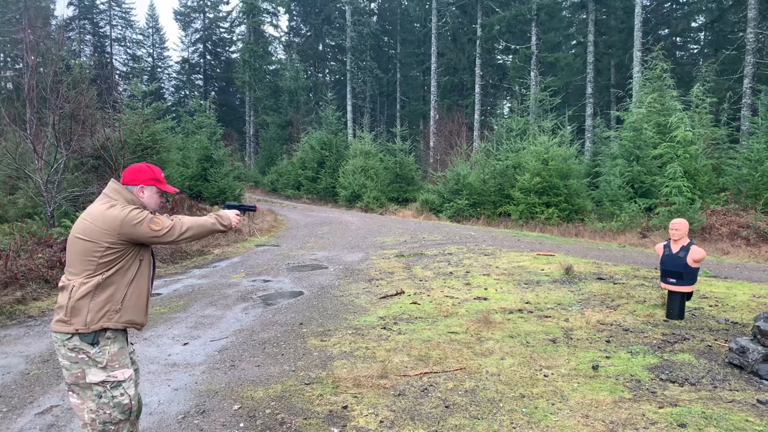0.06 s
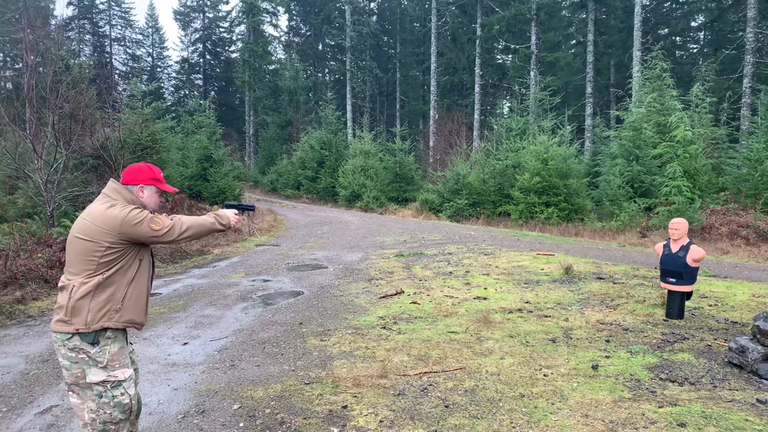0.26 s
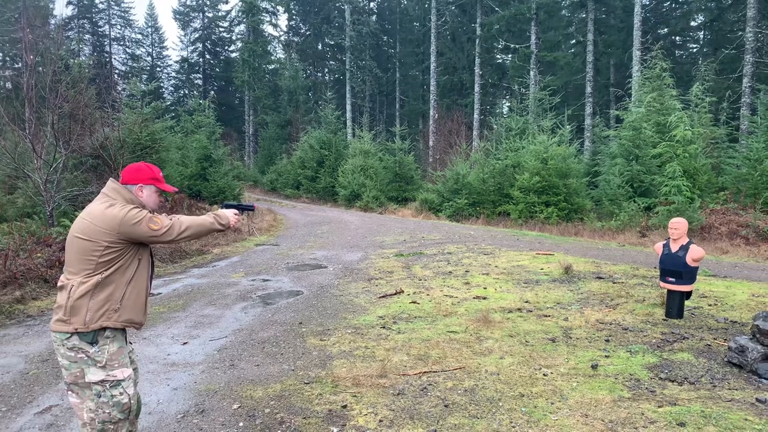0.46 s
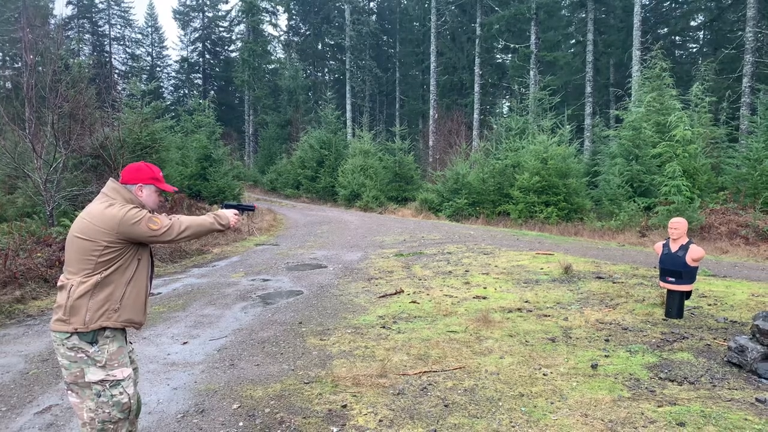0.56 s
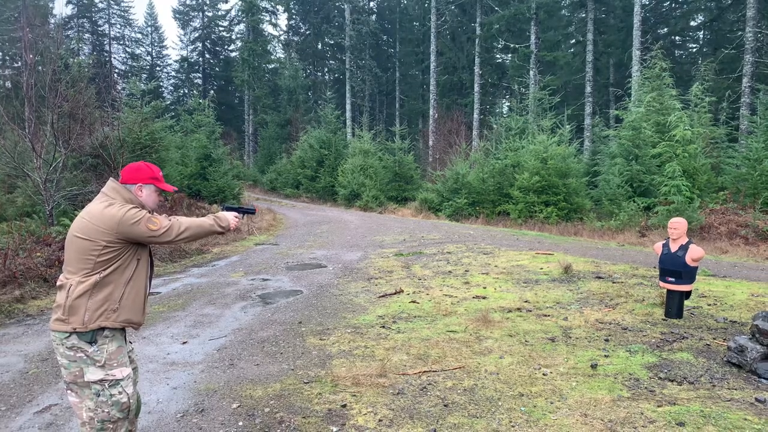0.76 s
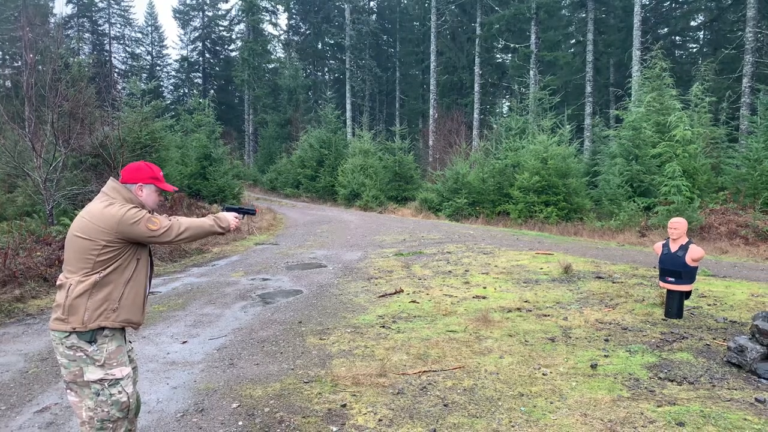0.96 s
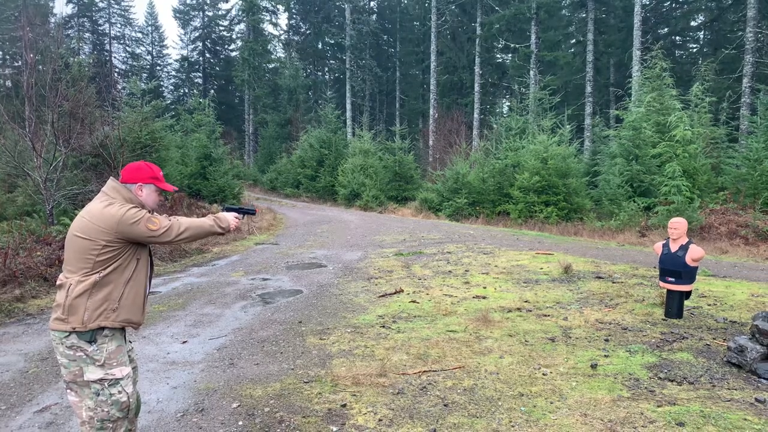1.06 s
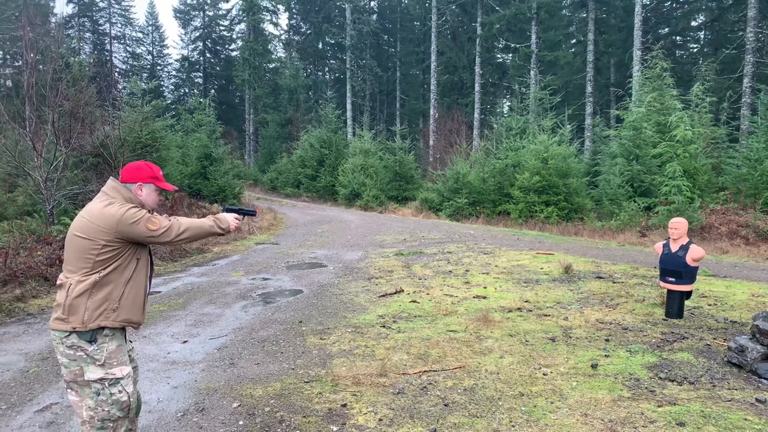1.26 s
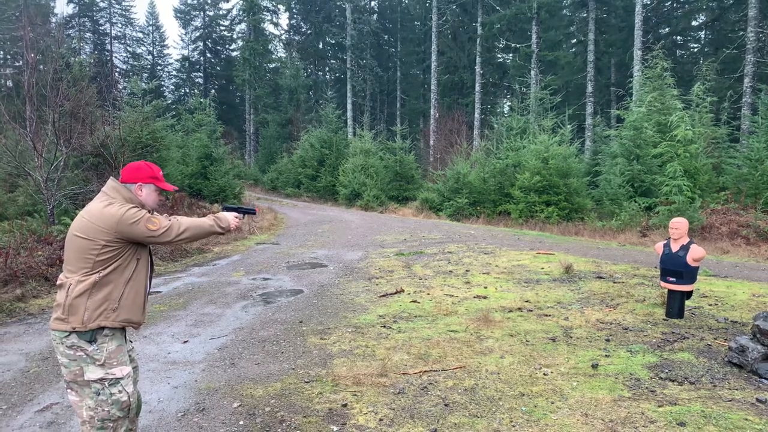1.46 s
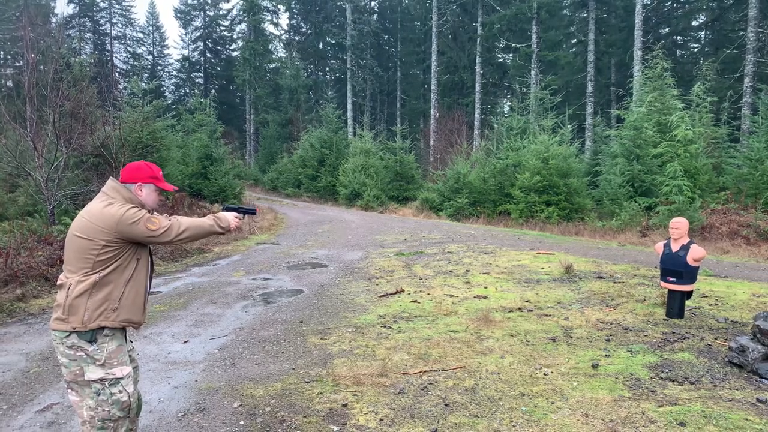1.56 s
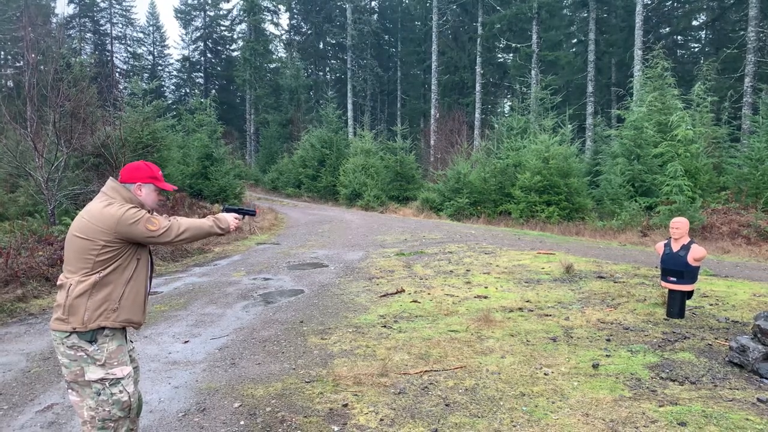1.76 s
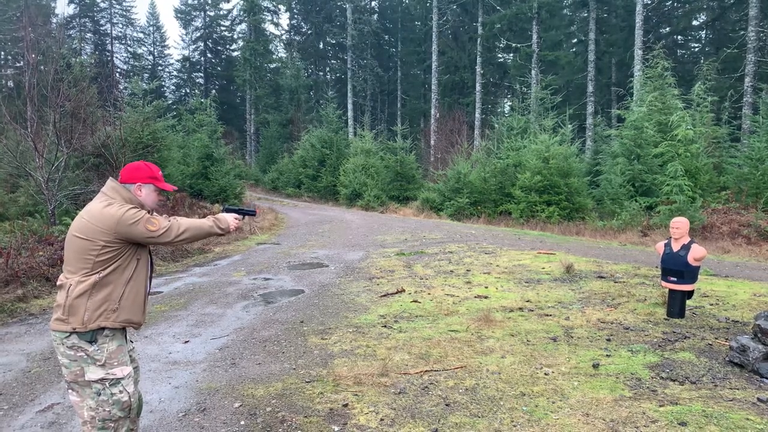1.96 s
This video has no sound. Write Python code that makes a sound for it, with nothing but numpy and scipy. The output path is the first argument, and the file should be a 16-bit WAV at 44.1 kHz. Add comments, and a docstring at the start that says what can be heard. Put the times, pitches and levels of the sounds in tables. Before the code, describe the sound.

Gas airsoft pistol fires three snappy pops outdoors, each clacking and hitting a padded dummy, trees echoing

```python
"""Three shots from a gas airsoft pistol on a damp forest road, left of a two-port microphone.
A hiss from the trees is already dying away at the start, over light wind, soft gusts and faint ticks.
Each shot: a short noise rise, valve crack and gas hiss from noise and struck modes, then low sine gas pops;
the slide rings at its rear stop and slams home, and the pellet smacks a padded dummy on the right.
From each hammer fall, a slow noise hiss swells out of the trees; a faint trigger creep precedes shot two."""
import sys
import numpy as np
from scipy import signal
from scipy.fft import rfft, irfft, next_fast_len
from scipy.io import wavfile
from scipy.ndimage import uniform_filter1d

SR = 44100
rng = np.random.default_rng(int(sys.argv[2]) if len(sys.argv) > 2 else 0)


def transcribe(u):
    """Save the signal u as a 16-bit wav file named by the first command-line argument.

    u: samples, shape (n,) or (channels, n), limited to [-1, 1]; the rate is SR.
    q: integer samples, one column per channel.
    """
    v = np.clip(np.atleast_2d(u).T, -1, 1)
    q = np.round(v * 32767).astype(np.int16)
    wavfile.write(sys.argv[1], SR, q)


N = 88200
T = np.arange(SR // 8) / SR  # time axis of every short sound, s

# Hammer falls. Each row: start in seconds, base level in dB, base gas pop level in dB.
SHOTS = [(.2355, -8, -15), (.7809, -9, -18), (1.3970, -10.5, -16.5)]
# Contacts and puffs in the action. Each row: delay after the hammer in seconds, level against the shot
# in dB, noise t60 in seconds, centre of the noise emphasis in Hz, ring against the strike in dB.
STRIKES = [(0, 8, 0.0059, 13400, -20.5), (.0017, 5.5, .006, 9000, -5.5), (.0048, -8, 0.0065, 2970, -10),
           (.008, -9.5, .01, 9000, -15.5), (0.0135, 11, 0.0026, 2211, -20),
           (0.03, -14, 0.0087, 9000, -23.5)]
# Ringing metal of the action. Each row: mode in Hz, level in dB, t60 in seconds.
ACTION_MODES = [(520, -14.5, 0.019), (967, -11.5, 0.029), (2050, -6, 0.029), (3814, -15, 0.032),
                (6400, -10, 0.06), (9100, -12, 0.014), (9140, -0.5, 0.013), (13240, -19.5, .011)]
# Colour of the valve crack and gas hiss. Each row: frequency in Hz, relative density in dB.
CRACK_COLOUR = [(240, -52), (400, -25), (2420, -4.5), (2700, 0), (3800, -16), (7400, -13), (9200, -7.5),
                (11400, -19.5), (14200, -15.5), (16300, -34.5)]
# Gas leaving the barrel. Each row: delay after the hammer in seconds, level against the shot's gas in dB,
# pitch in Hz, hold in seconds.
POPS = [(.0064, -7, 320, .0034), (.0143, 0, 298, .0072)]
# Slide at its rear stop. Each row: start in seconds, level in dB, wait for the rebound in seconds.
REAR_STOPS = [(.2670, -11.5, .0075), (.8141, -15.5, .0095), (1.4294, -16, .007)]
# Ringing slide. Each row: mode in Hz, level in dB, t60 in seconds.
SLIDE_MODES = [(2920, -19, .012), (5900, -17, .012), (6900, -9, .024), (7050, 0, .019), (8030, -14, .012),
               (9210, -11, .01), (13500, -10, .006)]
# Slide slamming shut. Each row: start in seconds, base level in dB.
SLAMS = [(.3065, -15), (.8515, -20), (1.4674, -17)]
# Parts rattling around the slam. Each row: delay after it in seconds, level against it in dB,
# noise t60 in seconds.
RATTLE = [(-.0055, -1, .012), (-.003, -6.5, .01), (0, 5.5, .008), (.0015, -8.5, 0.0092), (.004, 11, .01),
          (.008, -3, .012), (.011, -6, .012)]
# Colour of metal shutting. Each row: frequency in Hz, relative density in dB.
SHUT_COLOUR = [(240, -54), (400, -22), (1110, -4), (4300, -13), (8780, -9.5), (11800, -11), (12700, -13.5),
               (14600, -10), (16300, -20)]
# Trigger taking up its slack. Each row: start in seconds, level in dB.
CREEP = [(.7335, -43)]
# Pellet on the dummy. Each row: start in seconds, base level in dB, body thud against it in dB.
HITS = [(0.3111, -20.5, -17.5), (0.8541, -7.5, -20.5), (1.4709, -9, -32)]
# Padded vest. Each row: mode in Hz, relative level in dB, t60 in seconds.
VEST_MODES = [(780, -10, .012), (1120, 3, .02), (1750, -3, .012), (2400, -6, .008), (2950, -5, .01),
              (5500, -10, .004)]
# Colour of the tree echoes. Each row: frequency in Hz, relative density in dB.
TREES_COLOUR = [(180, -41.5), (300, -15), (1520, -11.5), (2470, -4), (9090, -13), (10600, -15),
                (11500, -35), (12500, -7.5), (14800, -16.5), (16300, -35.5)]
# Swell of the tree echoes. Each row: frequency in Hz, rise time in seconds.
TREES_RISE = [(3000, 0.1179), (9000, .05)]
# Decay of the tree echoes. Each row: frequency in Hz, t60 in seconds.
TREES_T60 = [(300, 2), (3000, 1.84), (6000, 0.98), (9000, 1.1), (16000, 0.56)]
# Faint ticks. Each row: start in seconds, base level in dB, pitch in Hz.
TICKS = [(0.374, -44, 8900), (.505, -72, 14000), (.565, -71, 14000), (0.6481, -54.5, 7550),
         (1.0237, -56.5, 14400), (1.0771, -56.5, 14000), (1.2227, -52.5, 9000), (1.2591, -49, 13800),
         (1.3529, -51, 8450), (1.815, -57, 9000), (1.9186, -51.5, 14200)]
# Colour of the forest air. Each row: frequency in Hz, relative density in dB.
AIR_COLOUR = [(59, -37.5), (100, -6.5), (202, -11.5), (426, -14.5), (516, -17), (626, -15.5), (4350, -22),
              (11600, -45.5), (15000, -24.5), (16300, -36.5)]
# Colour of the low wind. Each row: frequency in Hz, relative density in dB.
RUMBLE_COLOUR = [(15, -42.5), (25, -6.5), (43, -16), (65, -2.5), (200, -36.5), (260, -53.5), (440, -120)]
# Soft thuds of wind on the microphone. Each row: centre in seconds, level in dB, pitch in Hz,
# half width in seconds.
GUSTS = [(.05, -52, 55, 0.026), (.16, -43, 65, 0.0072), (.21, -47.5, 65, 0.033), (.35, -58.5, 55, .03),
         (.5, -60, 70, 0.024), (.65, -53, 65, .015), (.7, -48.5, 60, 0.013), (1.05, -66, 55, 0.017),
         (1.18, -61, 55, .05), (1.299, -62.5, 130, 0.032), (1.745, -38.5, 55, 0.018),
         (1.884, -51.5, 60, .018), (1.945, -41.5, 55, 0.015)]
# Likeness of diffuse sound at the ports. Each row: frequency in Hz, left-right correlation (-1 to 1).
ALIKE = [(60, 0.64), (180, 1), (550, 0.093), (1650, -0.18), (4970, 0.39), (15000, -0.11)]
# Balance of the ports. Each row: frequency in Hz, left minus right in dB.
PORT_BALANCE = [(400, 0), (1300, -3.5), (2400, -1), (4400, 1), (8000, 0)]
# Colour of scatter from ground and bushes. Each row: frequency in Hz, relative level in dB.
SCATTER_COLOUR = [(400, -30), (1500, 0), (16000, -3)]

LEAD_S, LEAD_DB = .002, -6.5  # short noise rise leading into each shot: rise time, level against the shot
GAS_DB, GAS_T60 = -7, 0.11  # gas hiss against the shot, s
STRIKE_OCTAVES = 1.05  # width of the noise emphasis in a strike
POP_ATTACK_S, POP_T60, POP_OCTAVE_DB = .0005, .009, -16
PUSH_DB, PUSH_HZ = -23.5, 88  # low push under the pops
RUN_S, RUN_DB = .007, -13.5  # slide scrape: rise time, level against the slam
REBOUND_DB, STOP_CRACK_DB = -14, -10  # against the rear stop
SMACK_FROM_HZ = 500  # the smack carries little below this
BODY_HZ, BODY_T60 = 359.7, .025
TREES_DB, PATCHY_DB = -43.5, 1.6  # base level, rms of the uneven patches
TICK_T60, TICK_WIDTH = 0.01, .25  # s, width in natural-log frequency
AIR_DB, WIND_DB = -60.5, -68
GUN_LAG_S, STOP_LAG_S, DUMMY_LAG_S = 0.0002238, .000142, -0.00022  # right port after left
LAG_FROM_HZ = 800  # the lag shrinks below this
NEAR_DB, NEAR_T60 = -9, .006  # near scatter
BUSH_DB, BUSH_T60 = -14.5, 0.083  # longer scatter
NOTCH_HZ, NOTCH_WIDTH_HZ, NOTCH_DB = 11600, 450, -10
TOP_HZ = 16100  # middle of the band edge


def pistol():
    """Hammer and valve strike metal, gas hisses and pops, and the slide runs home."""
    out = np.zeros(N)
    for s, db, gas_db in SHOTS:
        add(out, s - 3 * LEAD_S, amp(db + LEAD_DB) * rising_noise(CRACK_COLOUR, LEAD_S))
        add(out, s, amp(db + GAS_DB) * burst(CRACK_COLOUR, GAS_T60))
        push = fade(0.14, .004) * np.sin(2 * np.pi * PUSH_HZ * T)
        add(out, s + POPS[0][0], amp(gas_db + PUSH_DB) * push)
        for late, strike_db, t60, peak_hz, ring_db in STRIKES:
            crack = 0.61 * burst(CRACK_COLOUR, t60, peak_hz, STRIKE_OCTAVES)
            strike = crack + amp(ring_db) * ring(ACTION_MODES)
            add(out, s + late, amp(db + strike_db) * strike)
        for late, pop_db, hz, held_s in POPS:
            add(out, s + late, amp(gas_db + pop_db) * pop(hz, held_s))
    for s, db in CREEP:
        add(out, s, amp(db) * burst(SHUT_COLOUR, .02, 2500, 1))
    for s, db in SLAMS:
        # The slide scrapes as it runs home.
        add(out, s - 3 * RUN_S, amp(db + RUN_DB) * rising_noise(SHUT_COLOUR, RUN_S))
        for late, part_db, t60 in RATTLE:
            part = 0.47 * burst(SHUT_COLOUR, t60) + amp(-13) * ring(ACTION_MODES)
            add(out, s + late, amp(db + part_db) * part)
    return out


def pop(hz, held_s):
    """The gas column swings at full strength while gas flows, then dies quickly."""
    shape = (1 - np.exp(-T / POP_ATTACK_S)) * amp(-60 * np.maximum(T - held_s, 0) / POP_T60)
    octave = amp(POP_OCTAVE_DB) * np.sin(4 * np.pi * hz * T)
    return -shape * (np.sin(2 * np.pi * hz * T) + octave)


def rising_noise(spectrum, rise_s):
    """Coloured noise that grows for three rise times, then breaks off."""
    noise = unit(filtered(rng.standard_normal(len(T)), lambda hz: amp(along(spectrum, hz))))
    return noise * np.exp(T / rise_s - 3) * (T < 3 * rise_s)


def rear_stop():
    """The slide rings briefly where its travel ends, then rings again, softer, on the rebound."""
    out = np.zeros(N)
    for s, db, rebound_s in REAR_STOPS:
        crack = amp(STOP_CRACK_DB) * burst(SHUT_COLOUR, .014)
        add(out, s, amp(db) * (ring(SLIDE_MODES, scatter_db=1) + crack))
        add(out, s + rebound_s, amp(db + REBOUND_DB) * ring(SLIDE_MODES, scatter_db=1))
    return out


def pellet():
    """A short smack excites the padded vest, with the hollow body sounding under it."""
    smack, body = np.zeros(N), np.zeros(N)
    for s, db, body_db in HITS:
        contact = 0.43 * ring(VEST_MODES, scatter_db=5.5) + 0.6 * burst(SHUT_COLOUR, 0.0082)
        add(smack, s, amp(db) * contact)
        thud = fade(BODY_T60, 0.0013) * np.sin(2 * np.pi * BODY_HZ * T)
        add(body, s, amp(db + body_db) * thud)
    # Three gentle high-pass stages thin the smack.
    return filtered(smack, lambda hz: (1j * hz / (SMACK_FROM_HZ + 1j * hz)) ** 3) + body


def trees():
    """Echoes from ever more trunks swell after each shot, the treble generally dying sooner."""
    out = np.zeros((2, N))
    # The first swell begins before the scene, so only its later part is heard.
    for s in [-.35] + [shot[0] for shot in SHOTS]:
        hz, t, bands = signal.stft(rush(TREES_COLOUR, count=2 * SR), SR, nperseg=256)
        rise = 1 - np.exp(-(t / along(TREES_RISE, hz)[:, None]) ** 2)
        swell = rise * amp(-60 * t / along(TREES_T60, hz)[:, None])
        # Smoothing over frequency and time makes patches in the hiss.
        patches = uniform_filter1d(rng.standard_normal(bands.shape[1:]), size=8, axis=0)
        patches = unit(uniform_filter1d(patches, size=8, axis=1))
        tail = signal.istft(bands * amp(PATCHY_DB * patches) * swell, SR, nperseg=256)[1]
        add(out, max(s, 0), amp(TREES_DB) * tail[:, round(max(-s, 0) * SR):])
    return out


def ticks():
    """Tiny clicks of narrow noise, each with its own pitch and independent at the two ports."""
    out = np.zeros((2, N))
    for s, db, hz in TICKS:
        band = lambda f: np.exp(-(np.log((f + 1) / hz) / TICK_WIDTH) ** 2)
        click = filtered(rng.standard_normal((2, len(T))), band)
        add(out, s, amp(db + 2) * unit(click) * fade(TICK_T60))
    return out


def air():
    """Quiet forest hiss and low wind as diffuse noise, with gusts as sine thuds on both ports."""
    t = np.arange(N) / SR
    gusts = np.zeros(N)
    for s, db, hz, half_s in GUSTS:
        swell = np.exp(-((t - s) / half_s) ** 2)
        gusts += amp(db) * swell * np.sin(2 * np.pi * (hz * t + rng.random()))
    hiss = amp(AIR_DB) * rush(AIR_COLOUR, count=N)
    return hiss + amp(WIND_DB) * rush(RUMBLE_COLOUR, count=N) + gusts


def ports(x, lag_s):
    """Two ports hear a source at different times; ground and nearby bushes add short scatters."""
    def turn(hz):
        lag = lag_s * hz ** 2 / (hz ** 2 + LAG_FROM_HZ ** 2)
        return amp(along(PORT_BALANCE, hz) / 2) * np.exp(1j * np.pi * hz * lag)

    direct = filtered(x, lambda hz: np.array([turn(hz), 1 / turn(hz)]))
    scatter = np.zeros((2, len(T)))
    for db, t60 in ((NEAR_DB, NEAR_T60), (BUSH_DB, BUSH_T60)):
        tail = rush(SCATTER_COLOUR, count=len(T)) * fade(t60, 0.003)
        scatter += amp(db) * tail / np.linalg.norm(tail[0])
    return direct + signal.fftconvolve(x[None], scatter, axes=1)[:, :N]


def burst(spectrum, t60, peak_hz=6000, octaves=9):
    """A decaying spit of coloured noise, emphasised around one frequency."""
    def colour(hz):
        return amp(along(spectrum, hz)) * np.exp(-(np.log2((hz + 1) / peak_hz) / octaves) ** 2)

    return unit(filtered(rng.standard_normal(len(T)), colour)) * fade(t60)


def ring(modes, scatter_db=3.0):
    """Decaying sine modes, with fresh levels and phases at every strike."""
    out = np.zeros(len(T))
    for hz, db, t60 in modes:
        level = amp(db + rng.normal(0, scatter_db))
        out += level * fade(t60) * np.sin(2 * np.pi * (hz * T + rng.random()))
    return out


def rush(spectrum, count):
    """Diffuse stereo noise of rms 1: the mid-side balance sets the likeness of the ports."""
    def mid_side(hz):
        turn = np.arccos(np.clip(along(ALIKE, hz), -1, 1)) / 2
        return amp(along(spectrum, hz)) * [np.cos(turn), np.sin(turn)]

    mid, side = filtered(rng.standard_normal((2, count)), mid_side)
    return unit(np.array([mid + side, mid - side]))


def fade(t60, attack_s=0.00014):
    """Quick rise, then exponential decay."""
    return (1 - np.exp(-T / attack_s)) * amp(-60 * T / t60)


def amp(db):
    """Decibels to amplitude."""
    return 10 ** (np.asarray(db) / 20)


def unit(x):
    """Scale to rms 1."""
    return x / np.sqrt(np.mean(x ** 2) + 1e-20)


def along(points, hz):
    """Read (Hz, value) points along a log frequency axis."""
    f, v = np.transpose(points)
    return np.interp(np.log(hz + 1), np.log(f + 1), v)


def filtered(x, response):
    """Shape x by a complex response of frequency."""
    m = next_fast_len(x.shape[-1] + 8192)
    shaped = rfft(x, m) * response(np.fft.rfftfreq(m, 1 / SR))
    return irfft(shaped, m)[..., :x.shape[-1]]


def add(track, s, sound):
    """Mix a sound in at a time in seconds, cut at the end of the track."""
    part = track[..., round(s * SR):][..., :sound.shape[-1]]
    part += sound[..., :part.shape[-1]]


def scene():
    """Everything at the two ports."""
    gun = ports(pistol(), GUN_LAG_S) + ports(rear_stop(), STOP_LAG_S)
    return gun + ports(pellet(), DUMMY_LAG_S) + trees() + ticks() + air()


def record(dry):
    """A narrow dip in the treble near 11.6 kHz; nothing passes above the band edge."""
    notched = filtered(dry, lambda hz: amp(NOTCH_DB * np.exp(-((hz - NOTCH_HZ) / NOTCH_WIDTH_HZ) ** 2)))
    return filtered(notched, lambda hz: np.clip((TOP_HZ + 350 - hz) / 700, 0, 1) ** 2)


dry = scene()
out = record(dry)
transcribe(out)
```